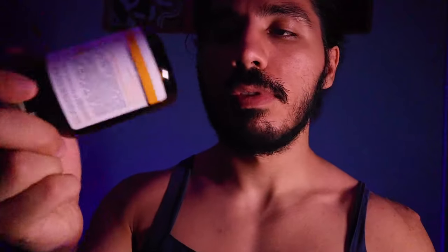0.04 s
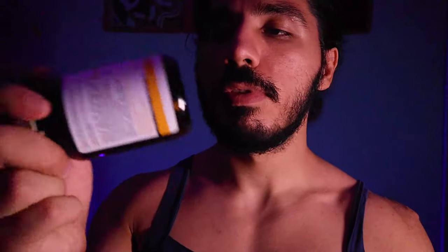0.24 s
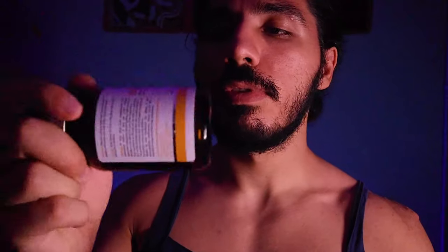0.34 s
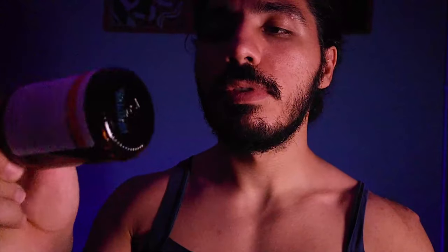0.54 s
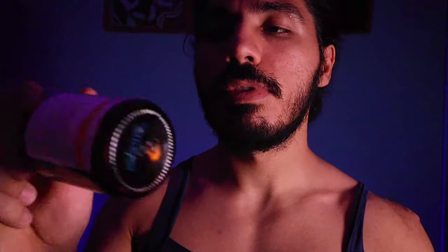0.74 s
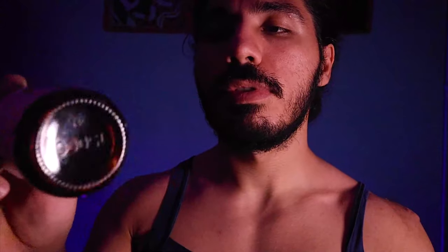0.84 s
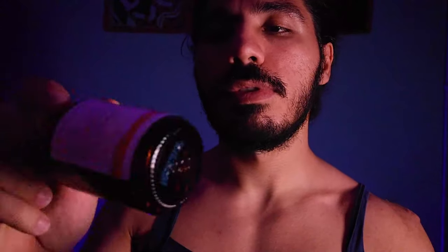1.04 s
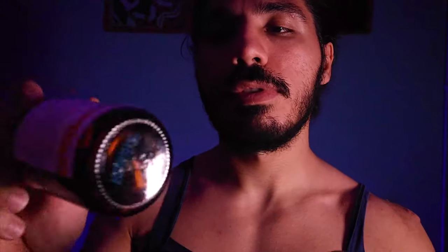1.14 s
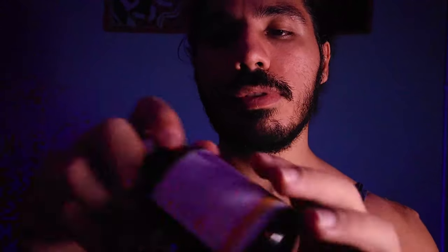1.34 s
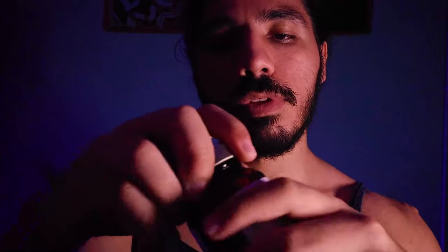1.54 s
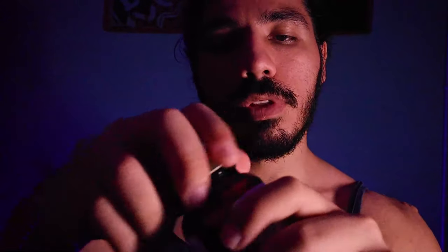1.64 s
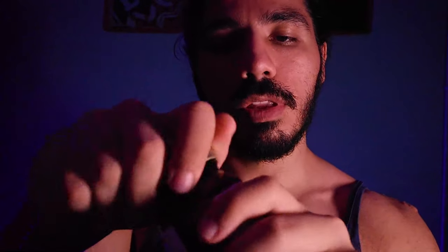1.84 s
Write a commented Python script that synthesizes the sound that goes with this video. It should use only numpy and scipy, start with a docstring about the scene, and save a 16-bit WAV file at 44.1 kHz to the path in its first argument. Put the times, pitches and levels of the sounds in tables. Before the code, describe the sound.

Pills in a small glass bottle slide with a sharp clattering burst, then rattle in smaller clinks and ticks as it turns, thinning to quiet room noise; close stereo, moving from left to front.

```python
"""A glass bottle of hard pills is tipped and turned close to a stereo microphone in a quiet room.
Over steady room noise the heap tumbles as random small contacts, swelling whenever it slides.
Pills soon clink on the thin wall (high ringing modes), snap together (short bright ticks) and clack
on base and cap (low short modes); low thuds come from the hands as the grip shifts.
The bottle moves from the left toward the front, and the rattle thins out until the room remains."""
import sys
import numpy as np
from scipy import signal
from scipy.fft import rfft, irfft
from scipy.io import wavfile

SR = 44100
rng = np.random.default_rng(int(sys.argv[2]) if len(sys.argv) > 2 else 0)


def magnitude_from_level(level_db):
    """Linear magnitude for a level in decibels (20 dB per decade)."""
    exponent = np.asarray(level_db, float) / 20
    return 10 ** exponent


def generate_wav(sig):
    """Save sig (samples, or channels by samples) to the path in sys.argv[1] as 16-bit PCM at SR."""
    pcm = np.round(np.clip(np.atleast_2d(sig).T, -1, 1) * 32767).astype(np.int16)
    wavfile.write(sys.argv[1], SR, pcm)


N = 83790
TIME_S = np.arange(N) / SR


def evened(x):
    """Normalization: scales a signal to unit rms."""
    return x / np.sqrt(np.mean(x ** 2) + 1e-20)


def read(points, hz):
    """Spectral interpolation: reads a table on a logarithmic frequency axis."""
    table_hz, value = np.transpose(points)
    return np.interp(np.log(hz + 1), np.log(table_hz + 1), value)


def curve(points, column):
    """Envelope interpolation: reads a time table at every sample."""
    return np.interp(TIME_S, [p[0] for p in points], [p[column] for p in points])


def noise_pair(gain, likeness):
    """Partial coherence: two noises of one spectrum share a part of their waveform at each frequency."""
    a, b = rfft(rng.standard_normal((2, N)))
    likeness = np.clip(likeness, -1, 1)
    other = likeness * a + np.sqrt(1 - likeness ** 2) * b
    return evened(irfft(gain * np.array([a, other]), N))


# spectral shape of the room noise: pitch_hz [Hz], level_db [dB per Hz, relative]
ROOM_SPECTRUM = [(20, -45.5), (60, -1), (131, -9.5), (265, -18), (342, -15), (393, -25.5), (15200, -45.5),
                 (16500, -61)]
# coherence of the room noise: pitch_hz [Hz], likeness [left-right, 0 to 1]
ROOM_LIKENESS = [(60, 0.37), (300, 0.89), (3770, 0.11), (15000, 0.098)]


def room():
    """Stationary noise: the room's tone has a fixed spectrum and left-right coherence."""
    room_db = -56  # rms
    hz = np.fft.rfftfreq(N, 1 / SR)
    return magnitude_from_level(room_db) * noise_pair(magnitude_from_level(read(ROOM_SPECTRUM, hz)), read(ROOM_LIKENESS, hz))


def blow_train(s, size):
    """Impulse excitation: places each blow, with its size, at its sample."""
    return np.bincount(np.clip((s * SR).astype(int), 0, N - 1), size, N)


def ring(modes, s, weights, rise_s):
    """Modal superposition: each blow starts every mode with its own weight (blows x modes)."""
    t, out = np.arange(SR // 8) / SR, np.zeros(N)
    rise = np.sin(np.pi / 2 * np.minimum(t / rise_s, 1)) ** 2
    for (hz, db, t60_s), weight in zip(modes, weights.T):
        mode = rise * magnitude_from_level(db - 60 * t / t60_s) * np.sin(2 * np.pi * hz * t)
        out += signal.oaconvolve(blow_train(s, weight), mode)[:N]
    return out


# colour of the contact tick: pitch_hz [Hz], level_db [dB, relative]
TICK_COLOUR = [(150, -12.5), (350, -9), (650, -12), (1300, 0.5), (2200, -1), (4500, -13), (8000, -16),
               (10500, -27), (12000, -37.5), (16500, -60)]
TICK_T60_S = 0.0098


def ticks(s, size, t60_s=TICK_T60_S, tilt_db_per_oct=0):
    """Impact noise: each contact is a decaying burst, one of eight, under a causal minimum-phase colour."""
    first_touch = 3.19  # leads the burst, whose noise has unit deviation
    t, out, pick = np.arange(512) / SR, np.zeros(N), np.arange(len(s)) % 8
    hz = abs(np.fft.fftfreq(1024, 1 / SR))
    log_gain = np.log(magnitude_from_level(read(TICK_COLOUR, hz) + tilt_db_per_oct * np.log2(1 + hz / 1e3)))
    # the Hilbert transform of the log gain gives the minimum phase
    colour = np.fft.ifft(np.exp(np.conj(signal.hilbert(log_gain)))).real[:512]
    for k, burst in enumerate(rng.standard_normal((8, 512))):
        burst[0] = first_touch
        burst = np.convolve(burst * magnitude_from_level(-60 * t / t60_s), colour)
        out += signal.oaconvolve(blow_train(s, size * (pick == k)), burst / abs(burst).max())[:N]
    return out


# strength of the tumbling heap: start_s [s], knock_level_db [dB], clink_level_db [dB]
TUMBLING = [(0, -65.5, -75), (0.03, -50.5, -57.5), (0.06, -71.5, -87), (0.17, -71.5, -91), (0.19, -65, -55),
            (0.215, -45, -49), (0.26, -31, -34), (0.3, -32, -42), (0.34, -41.5, -57), (0.375, -44, -62),
            (0.395, -41, -35.5), (0.44, -39, -41), (0.49, -43, -41), (0.52, -53, -54.5),
            (0.575, -56.5, -66), (0.61, -52, -52), (0.71, -39.5, -51.5), (0.74, -43, -43.5),
            (0.81, -45, -50.5), (0.86, -57.5, -62), (0.92, -50.5, -66.5), (0.97, -52.5, -50),
            (1.0, -61, -66), (1.05, -65, -67), (1.1, -52, -53.5), (1.14, -53.5, -59.5), (1.18, -71, -81),
            (1.225, -82.5, -78.5), (1.25, -65, -47), (1.29, -40.5, -43.5), (1.335, -56.5, -61.5),
            (1.42, -44.5, -56), (1.495, -41.5, -42.5), (1.57, -48, -59.5), (1.62, -56.5, -71.5),
            (1.7, -67.5, -78), (1.9, -98.5, -100.5)]


def tumble():
    """Random impact process: many small contacts, strong while the heap slides."""
    contacts_per_s = 850  # mean rate, for knocks and for clinks alike
    slam_db, slam_hz, slide_hz = -37.5, 2230, 1500
    pitch_spread_oct = 0.14  # for a slam; three times as wide for the softest slide
    patter_db, patter_t60_s = 1, 0.004
    hit, big, tone = rng.random(N), rng.exponential(1, (2, N)), rng.standard_normal((3, N))
    knocks = hit < contacts_per_s / SR
    rings = hit > 1 - contacts_per_s / SR
    knock_curve_db = curve(TUMBLING, 1)
    size_db = 4.5 * np.minimum(big, 3) + [knock_curve_db, curve(TUMBLING, 2)]
    knock_db, ring_db = size_db[0, knocks], size_db[1, rings]
    # a slamming heap rings the base (soft near 0), a sliding one patters (soft near 1)
    soft = 1 / (1 + magnitude_from_level(2 * (knock_curve_db[knocks] - slam_db)))
    spread_oct = pitch_spread_oct * tone[0, knocks] * (1 + 2 * soft)
    hz = slam_hz * (slide_hz / slam_hz) ** soft ** 2 * 2 ** spread_oct
    knocking = clacks(TIME_S[knocks], knock_db - 9 * soft, hz)
    patter = ticks(TIME_S[knocks], soft * magnitude_from_level(knock_db + patter_db), patter_t60_s)
    middle_db = 7 * tone[1, rings] - 3
    top_db = -31.5 + 6 * tone[2, rings]
    clinking = clinks(TIME_S[rings], ring_db, middle_db, top_db, tick_db=3, scatter_db=4)
    return knocking + patter + clinking


# path of the bottle: start_s [s], front_share [0 left, 1 front]
BOTTLE_PATH = [(.5, 0), (1.15, 0.3), (1.55, 0.81)]
# differences between the ports: pitch_hz [Hz], left_over_right_db [dB] and left_lead [rad] with the
# bottle at the left, then front_left_over_right_db [dB] and front_left_lead [rad] in front
PORT_DIFFERENCES = [(300, 2, -.1, -2, .3), (1200, 3, .2, -2, .1), (2200, 3, .7, -2, .3),
                    (4000, 8, .7, 6, 0), (5300, 0, .2, 0, 0), (6700, 10, 2.6, -3, .7),
                    (8650, 7, -.9, 3, -.8), (13500, 3, 1.4, 1, 2.8)]


def ports(x):
    """Interchannel level and phase difference: two ports hear the bottle, blended between two places."""
    hz, rows = np.fft.rfftfreq(N, 1 / SR), np.array(PORT_DIFFERENCES)
    front, out = np.clip(curve(BOTTLE_PATH, 1), 0, 1), 0
    for k, share in ((1, 1 - front), (3, front)):
        level_db, lead = read(rows[:, [0, k]], hz), read(rows[:, [0, k + 1]], hz)
        half = magnitude_from_level(level_db / 2) * np.exp(.5j * lead)  # each port takes half the difference
        out = out + share * irfft(rfft(x) * np.array([half, 1 / half]), N)
    return out


def echoes(x):
    """Diffuse reverberation: a short decaying noise tail, different in each channel."""
    wet_db, wet_t60_s = -11.5, 0.08
    tail = rng.standard_normal((2, SR // 4)) * magnitude_from_level(-60 * np.arange(SR // 4) / SR / wet_t60_s)
    tail[:, :130] = 0  # gap before the tail, in samples
    tail /= np.linalg.norm(tail[0])
    return magnitude_from_level(wet_db) * signal.fftconvolve(x[None], tail, axes=1)[:, :N]


# pills striking the wall: start_s [s], level_db [dB], middle_over_low_ring_db [dB]
WALL_CLINKS = [(0.0294, -32, 31), (0.192, -29, -11.5), (0.2284, -19.5, -27), (0.2359, -15.5, -32),
               (0.2597, -15.5, -24), (0.3511, -14.5, 3.5), (0.3807, -16, 8), (0.4415, -15.5, 5),
               (0.453, -12, 3.5), (0.4623, -15.5, 16), (0.4789, -18.5, 6), (0.6487, -30, 9),
               (0.7267, -24.5, -13), (0.7369, -29.5, -4), (0.9232, -25, 1.5), (0.9655, -27, -3.5),
               (1.1112, -29, -5.5), (1.2427, -26.5, 4.5), (1.2778, -15.5, -21.5), (1.4126, -25, -26.5),
               (1.419, -25.5, -8.5), (1.4721, -29.5, -22.5), (1.4882, -32, -1), (1.495, -26, -5),
               (1.5003, -24, -12), (1.5599, -27, -27.5), (1.5784, -37.5, -3)]
# modes of the glass wall: pitch_hz [Hz], level_db [dB, relative], t60_s [s]
WALL_MODES = [(5290, -18, 0.013), (6676, -2.5, 0.035), (6775, -0.5, 0.013), (8730, -7, 0.0099),
              (8648, -4.5, 0.038), (9870, -17, 0.014), (13520, -2, 0.05), (13500, -3, .02)]
WALL_HZ = np.array(WALL_MODES)[:, 0]
SPLIT_HZ, TOP_HZ = 7700, 12000  # bounds between low, middle and top modes
WALL_RISE_S, TOP_DB = 0.00055, -18.5


def clinks(s, db, middle_db, top_db, tick_db, scatter_db):
    """Modal excitation by position: the struck spot shares the blow between low, middle and top modes."""
    size = magnitude_from_level(db)
    low = 1 / np.sqrt(1 + magnitude_from_level(middle_db) ** 2)[:, None]
    middle = np.sqrt(1 - low ** 2)
    share = np.where(WALL_HZ > TOP_HZ, magnitude_from_level(top_db)[:, None], np.where(WALL_HZ > SPLIT_HZ, middle, low))
    chance = rng.standard_normal((len(s), 2, len(WALL_MODES)))
    scatter = magnitude_from_level(scatter_db * chance[:, 0])
    sign = np.sign(chance[:, 1] + 1)  # mostly positive
    weights = size[:, None] * share * scatter * sign
    return ring(WALL_MODES, s, weights, WALL_RISE_S) + ticks(s, size * magnitude_from_level(tick_db))


def wall_clinks():
    """Coupled brightness: in single clinks the top ring weakens with the middle ring."""
    s, db, middle_db = np.transpose(WALL_CLINKS)
    top_db = TOP_DB + 0.7 * np.minimum(middle_db, 0)
    return clinks(s, db, middle_db, top_db, tick_db=-5.5, scatter_db=0.34)


# pills snapping against each other, dry and sharp: start_s [s], level_db [dB]
PILL_SNAPS = [(0.1188, -54), (0.2189, -15), (0.2358, -17.5), (0.3514, -11.5), (0.3833, -21.0),
              (0.5007, -20), (0.5455, -33), (0.588, -32), (0.6014, -31), (0.625, -22), (0.702, -21),
              (0.7224, -21), (0.7259, -11), (0.7382, -16), (0.7579, -25.0), (0.8253, -25), (0.865, -50),
              (0.89, -35.5), (0.942, -26), (0.9708, -29.5), (1.0627, -46.5), (1.09, -30.5), (1.1337, -36.0),
              (1.2498, -34.5), (1.442, -23), (1.4861, -16.5), (1.5375, -21.5), (1.5499, -28),
              (1.5606, -18.5), (1.5786, -25), (1.6457, -44), (1.6686, -31.5), (1.7007, -46)]


def snaps(s, db):
    """Hard-body impact: a very short bright tick that also shakes the wall a little."""
    snap_t60_s, tilt_db_per_oct, shake_db = 0.003, 2.5, -16
    chance = rng.standard_normal((len(s), len(WALL_MODES)))
    shake = magnitude_from_level(db + shake_db)[:, None] * chance * np.where(WALL_HZ > TOP_HZ, magnitude_from_level(TOP_DB), 1)
    return ticks(s, magnitude_from_level(db), snap_t60_s, tilt_db_per_oct) + ring(WALL_MODES, s, shake, WALL_RISE_S)


# pills knocking on base or cap: start_s [s], level_db [dB], pitch_hz [Hz, favoured]
BASE_CLACKS = [(0.217, -16.5, 2700), (0.225, -11.5, 2330), (0.232, -13, 2110), (0.2432, -7.5, 2460),
               (0.2492, -7.5, 2185), (0.2559, -14, 2080), (0.263, -16, 2540), (0.2735, -16, 2320),
               (0.4028, -22.5, 2030), (0.656, -18, 2280), (0.6593, -17, 1970), (0.6749, -12, 2110),
               (0.6985, -39, 2000), (1.2889, -22, 2175), (1.2971, -47, 1910), (1.472, -23, 1010.0),
               (1.5136, -24.5, 1780), (1.54, -25.5, 1780), (1.592, -34, 1780), (1.621, -37, 1050.0)]
# modes of base and cap: pitch_hz [Hz], level_db [dB, relative], t60_s [s]
BASE_MODES = [(1010, -7, .03), (1430, -8, .018), (1670, -4, .035), (1780, -4, .09), (1965, 0, .045),
              (2085, -2, .035), (2240, 0, .05), (2366, -2, .035), (2770, -3, .045), (3150, -5, .025)]


def clacks(s, db, hz):
    """Selective modal excitation: base and cap modes near the favoured pitch take most of the blow."""
    base_rise_s, reach_floor_db = 0.00073, -22
    tick_db, tick_tilt_db_per_oct = -7, 5.5
    # below 1850 Hz the reach is narrow: the low cap modes ring nearly alone
    reach_oct = np.where(hz < 1850, 0.03, 0.12)[:, None]
    away = np.log2(np.array(BASE_MODES)[:, 0] / hz[:, None]) / reach_oct
    reach = np.exp(-away ** 2 / 2) + magnitude_from_level(reach_floor_db) * rng.standard_normal(away.shape)
    reach /= np.linalg.norm(reach, axis=1)[:, None]
    ringing = ring(BASE_MODES, s, magnitude_from_level(db)[:, None] * reach, base_rise_s)
    return ringing + ticks(s, magnitude_from_level(db + tick_db), TICK_T60_S, tick_tilt_db_per_oct)


# low thuds of the hands: start_s [s], level_db [dB, envelope peak at the left], pitch_hz [Hz]
HAND_THUDS = [(0.439, -41, 66), (0.67, -44, 64.8), (1.287, -41, 67), (1.431, -48, 57), (1.494, -38, 61),
              (1.855, -46, 135)]


def thuds():
    """Damped low-frequency pulse: soft bumps swell and die as the grip shifts."""
    rise_s, right_gain, out = 0.016, 0.7, np.zeros(N)
    for s, db, hz in HAND_THUDS:
        age = np.maximum(TIME_S - s, 0)
        envelope = age / rise_s * np.exp(1 - age / rise_s)
        out += magnitude_from_level(db) * envelope * np.sin(2 * np.pi * hz * age)
    return out * np.array([[1], [right_gain]])


def scene():
    """Linear superposition: the bottle at the ports, its echoes, the hands and the room add."""
    bottle = tumble() + wall_clinks() + snaps(*np.transpose(PILL_SNAPS)) + clacks(*np.transpose(BASE_CLACKS))
    return ports(bottle) + echoes(bottle) + thuds() + room()


def roll_off(x):
    """The treble ends steeply here."""
    return signal.sosfilt(signal.butter(12, 16650, fs=SR, output="sos"), x)


def record(dry):
    """Signal chain: the finished mix passes through the last stage."""
    return roll_off(dry)


dry = scene()
out = record(dry)
generate_wav(out)
```